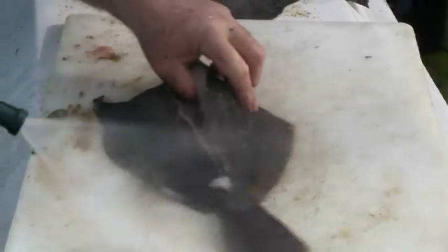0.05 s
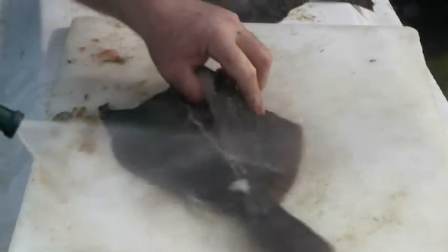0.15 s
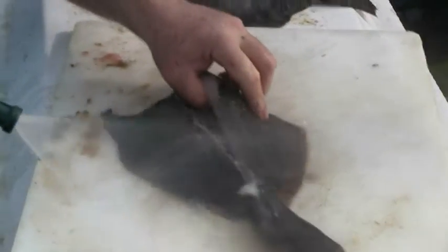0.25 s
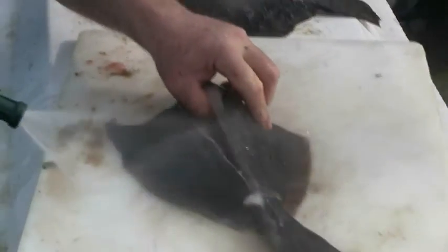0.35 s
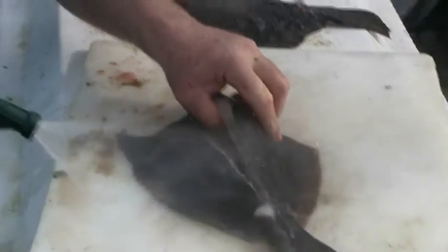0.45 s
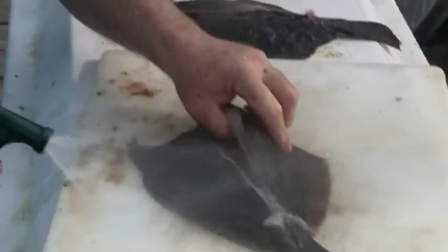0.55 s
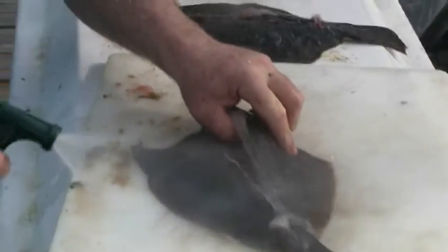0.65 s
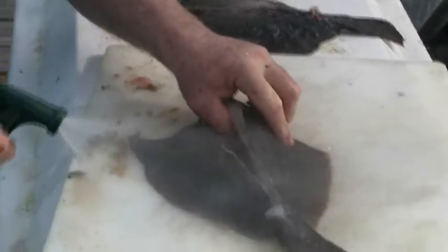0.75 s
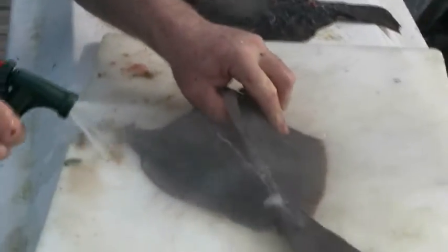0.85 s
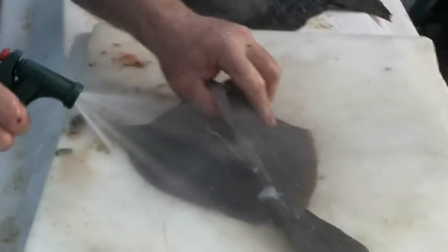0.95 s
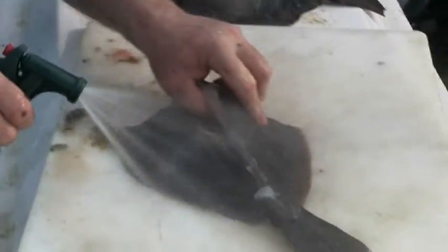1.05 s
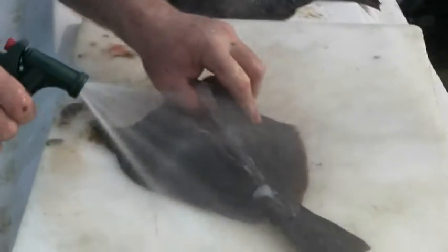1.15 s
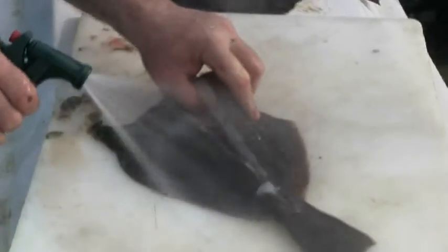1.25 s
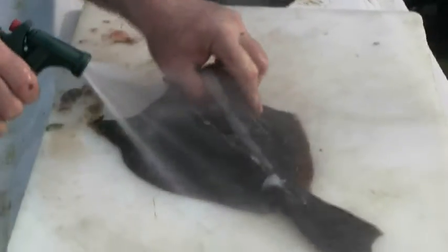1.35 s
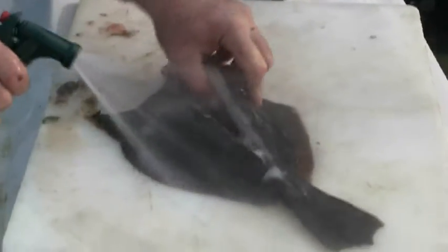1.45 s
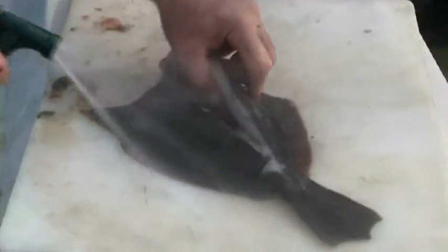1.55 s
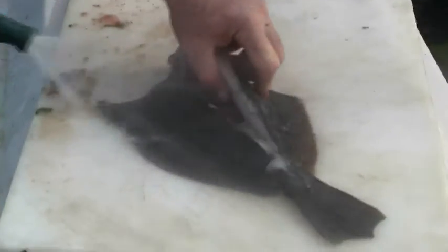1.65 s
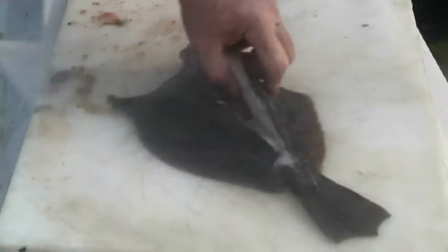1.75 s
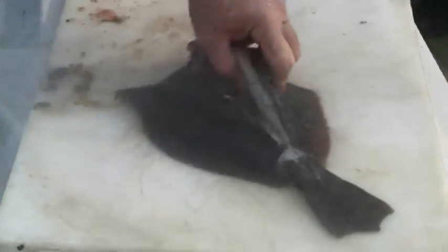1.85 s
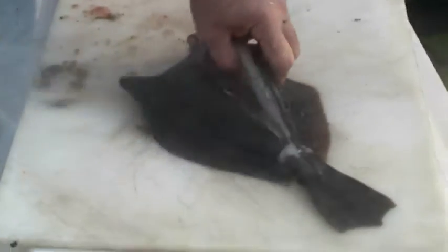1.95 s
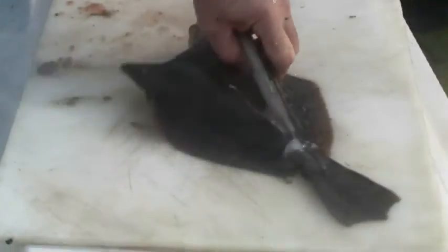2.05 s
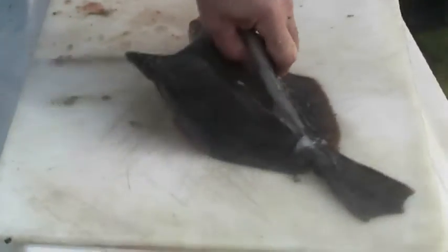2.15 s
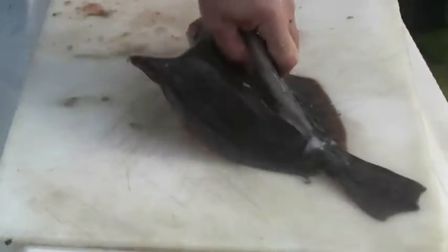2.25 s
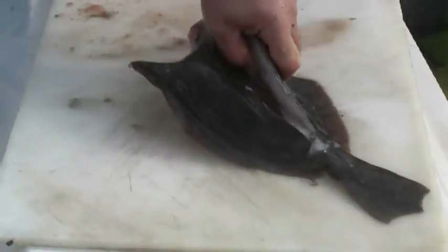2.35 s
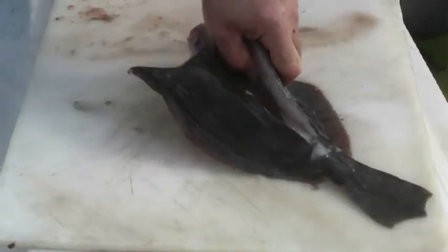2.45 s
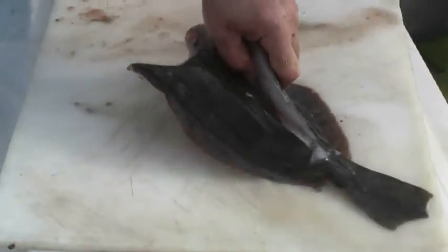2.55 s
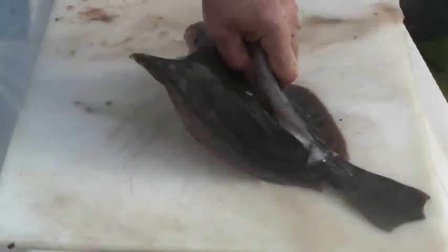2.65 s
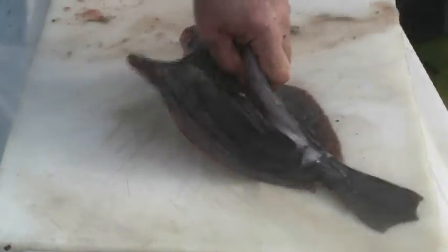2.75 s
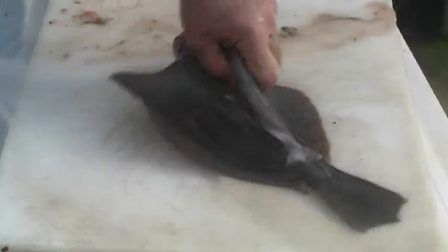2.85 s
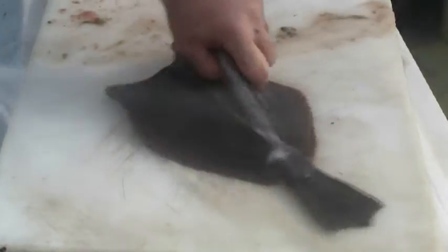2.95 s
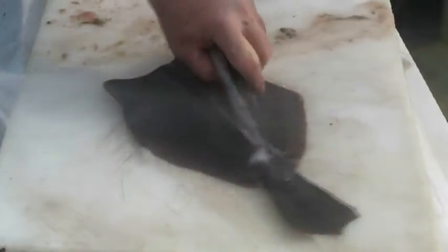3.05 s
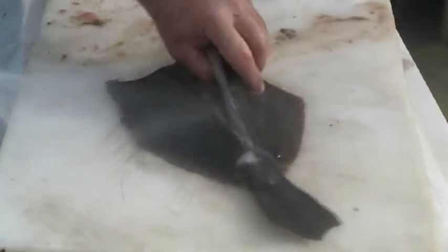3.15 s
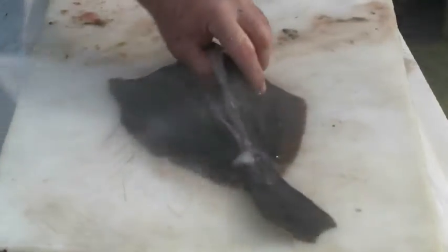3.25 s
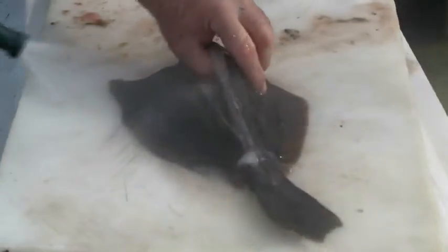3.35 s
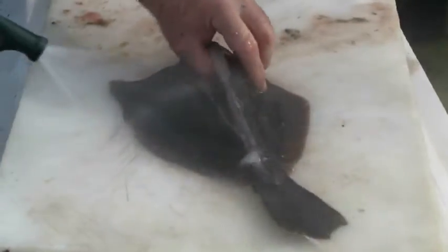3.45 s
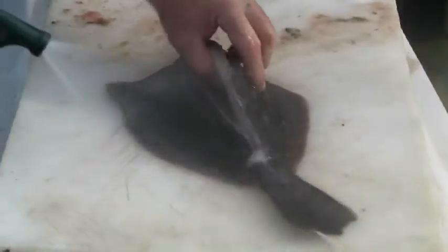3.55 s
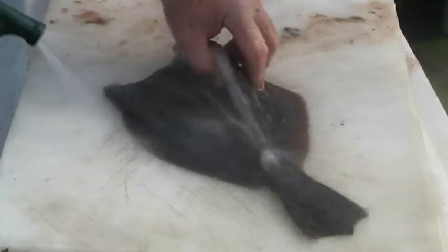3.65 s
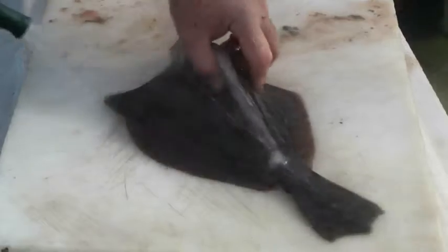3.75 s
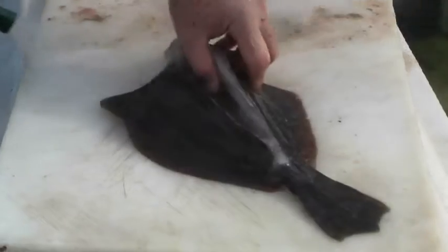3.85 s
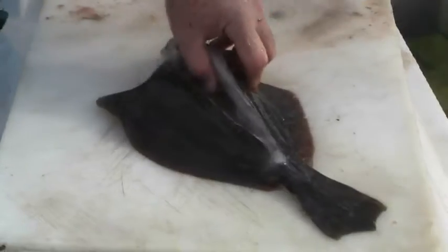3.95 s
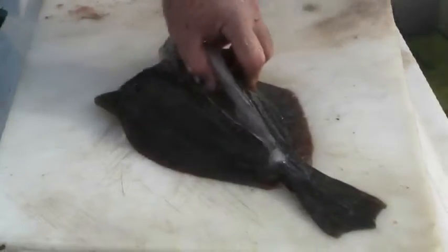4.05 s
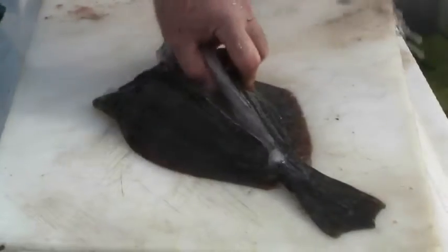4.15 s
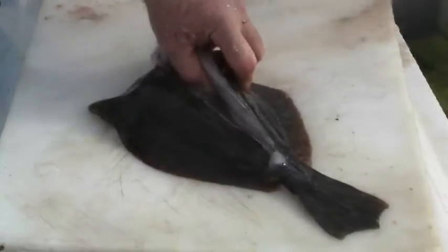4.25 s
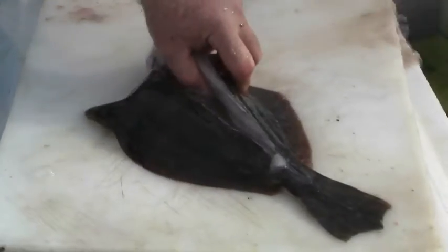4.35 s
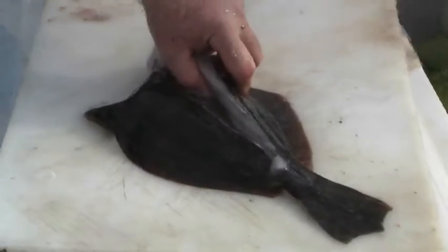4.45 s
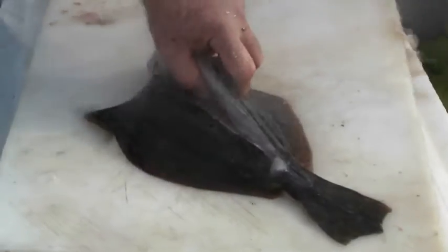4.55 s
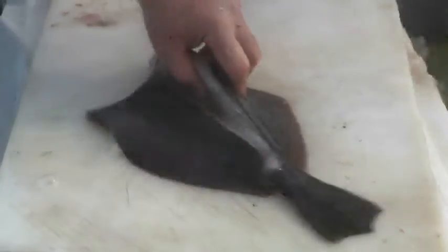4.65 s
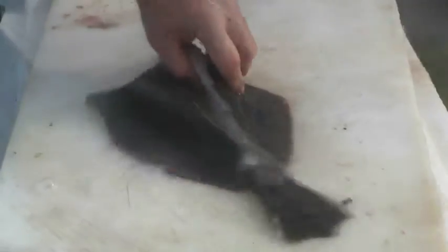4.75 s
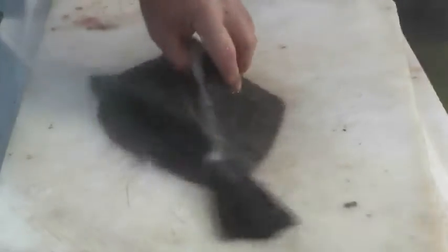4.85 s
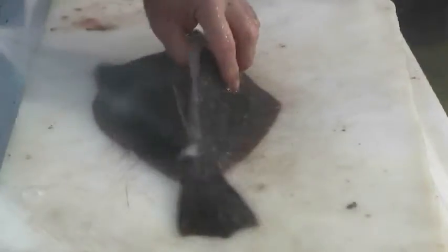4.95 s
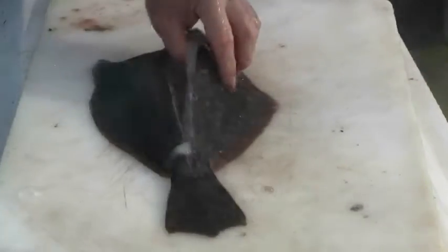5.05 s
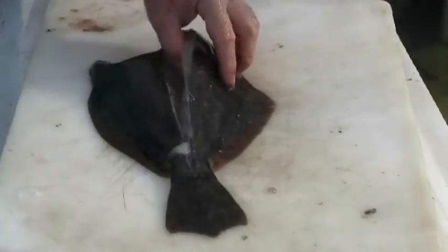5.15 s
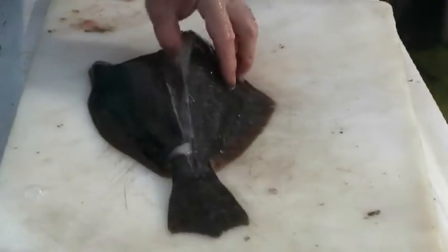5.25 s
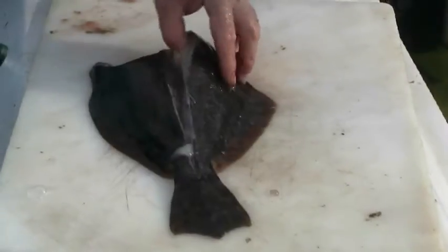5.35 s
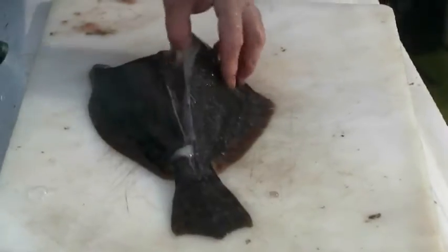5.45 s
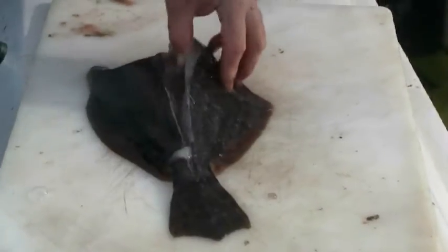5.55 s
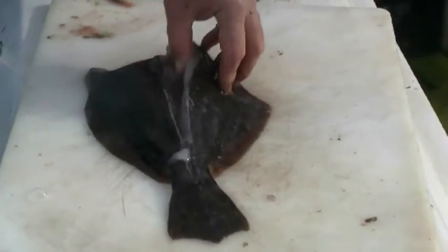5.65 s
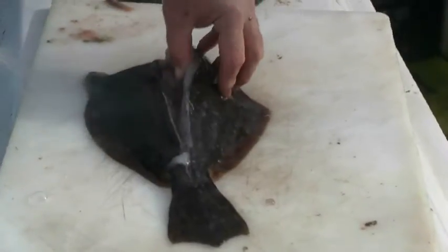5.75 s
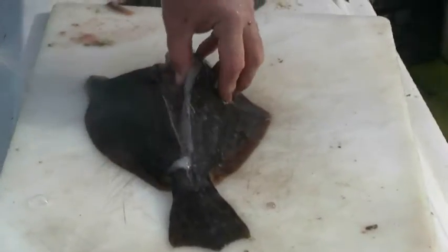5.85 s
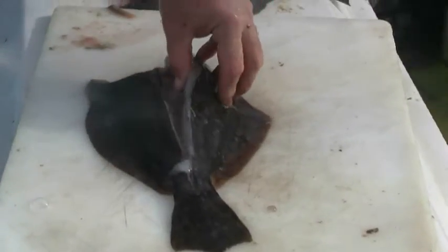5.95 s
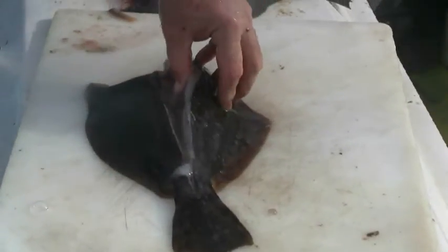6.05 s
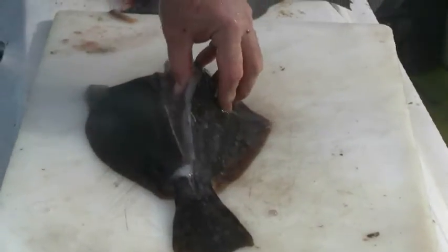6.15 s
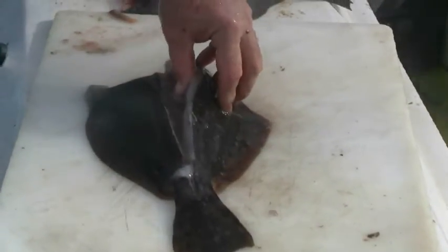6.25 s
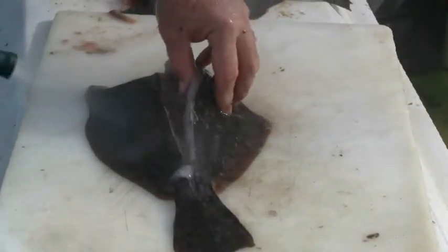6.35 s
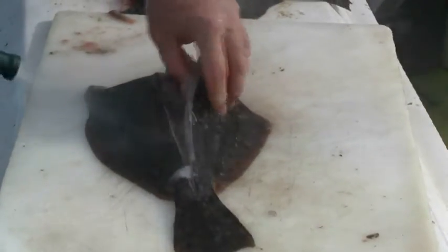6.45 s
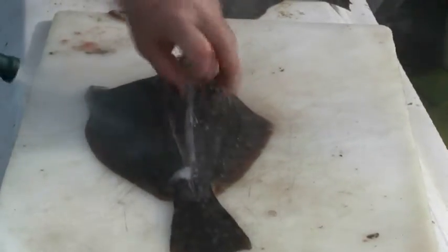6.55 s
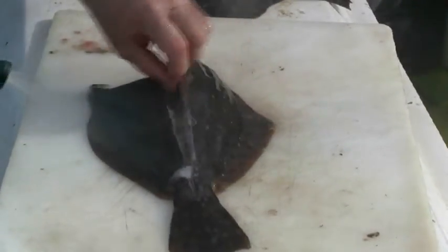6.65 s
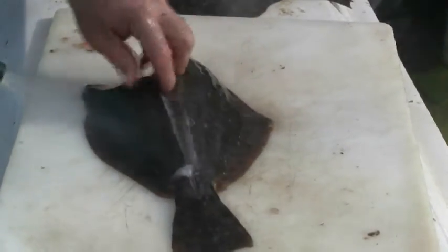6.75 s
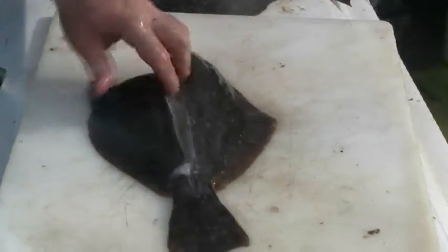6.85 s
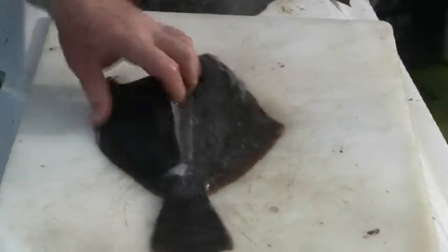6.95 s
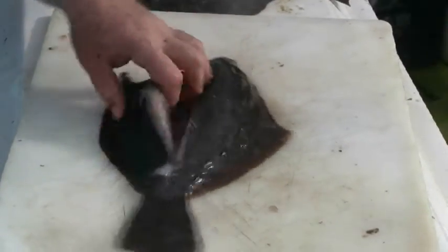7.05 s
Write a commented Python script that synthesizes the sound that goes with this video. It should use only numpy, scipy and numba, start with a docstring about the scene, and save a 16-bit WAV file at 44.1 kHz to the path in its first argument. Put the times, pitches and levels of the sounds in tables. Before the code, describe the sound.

A hose sprays hissing water over a fish on a plastic board, with wet slaps, then softer squirts and a few hard knocks.

```python
"""A hose gun sprays a gutted fish on a plastic cutting board, outdoors, close to the microphone.
The jet tears into droplets that hiss, and its drops patter on skin and board for five seconds.
It shuts, water runs off, and three softer squeezes follow. The wet fish slaps on the board, pockets
of air gloop, and hard knocks make the table ring. Short ringing crackles make wet squelches and
give knocks their bite. Behind it all are the outdoor air and an engine idling far away."""
import sys
import numpy as np
from scipy import signal
from scipy.fft import rfft, irfft
from scipy.io import wavfile
from scipy.ndimage import uniform_filter1d
from numba import njit

SR = 44100
rng = np.random.default_rng(int(sys.argv[2]) if len(sys.argv) > 2 else 0)


def digitize_waveform(pressure):
    """Quantize a signal to 16-bit integers and store it at the path in sys.argv[1].

    Rows of a 2-D input are taken as channels; values are limited to [-1, 1].
    """
    field = np.atleast_2d(pressure).T
    bounded = np.clip(field, -1, 1)
    quanta = np.round(bounded * 32767).astype(np.int16)
    wavfile.write(sys.argv[1], SR, quanta)


N = 312669
T = np.arange(N) / SR
FREQS = np.arange(N // 2 + 1) * SR / N

# squeezes of the trigger: open_s, shut_s, hiss_db, patter_db, attack_s, release_s, mist_share
SQUEEZES = [(0.095, 5.146, -1, 6, 0.022, .1, 1), (5.28, 5.33, -19, -8.5, .008, 0.8, 0),
            (5.5, 5.85, -17, -10, 0.16, 0.4, 1), (5.835, 6.7, -10.5, -5.5, 0.087, 1.36, 1)]
# strength of the jet; treble_db minus level_db sets how bright its top is: time_s, level_db, treble_db
JET_LEVEL = [(0.13, -26.5, -29), (0.18, -29, -33), (1.08, -29.5, -36), (1.52, -27, -28.5), (2.05, -33, -38),
             (2.23, -26.5, -35), (2.65, -26.5, -36), (3.07, -28, -33), (3.36, -28.5, -34),
             (3.79, -24.5, -27), (3.85, -27, -34), (4.14, -27, -39), (4.6, -28, -36), (4.66, -25.5, -34),
             (4.73, -27, -30), (4.84, -25.5, -33), (4.99, -27, -32), (5.13, -26.5, -32.5)]
# the gun sweeps twice over the fish; the echo off the board makes a comb, a row of peaks and dips
# in the hiss: time_s, spacing_hz, depth_factor
AIM = [(.1, 2630, .9), (.85, 2650, .65), (1.3, 2700, 1.0), (1.72, 2800, .7), (1.88, 3200, 0.4),
       (2.05, 4080, .8), (2.22, 4630, 1.3), (2.38, 4950, 0.9), (2.62, 4750, .6), (2.74, 4250, .9),
       (2.88, 3640, .5), (3.2, 3600, .5), (3.48, 3640, .45), (3.7, 4380, 0.4), (3.95, 4800, .7),
       (4.15, 5030, 1.2), (4.28, 4830, 1.4), (4.57, 4450, 0.7), (4.67, 3420, 1.1), (4.76, 2960, 1.3),
       (4.88, 2590, 0.8), (5.15, 2560, 0.6)]
# shape of that comb at depth 1: position_in_spacings, gain_db
COMB_SHAPE = [(.6, 0), (.95, -1.2), (1.2, 2.2), (1.38, 1.2), (1.62, 2.8), (1.85, .8), (2.08, -5.5),
              (2.3, 2.6), (2.42, 3.6), (2.85, -3.8), (3.45, 2.4), (3.8, -2), (4.32, 2.6), (4.7, -2.8),
              (5.5, 2)]
# tone of the jet's hiss: frequency_hz, gain_db
HISS_TONE = [(1500, -27), (2050, -11), (2550, -3.5), (3100, -6), (3700, -15.5), (4300, -8), (4950, -9.5),
             (5550, 0), (6300, 2), (7000, 0.2), (7750, -0.4), (8550, 3.5), (9400, -2), (10100, 0),
             (11000, -2), (11900, -3.5), (12700, -2), (13500, 0), (14300, -3.5), (15700, -4)]
# tone of the fine mist: frequency_hz, gain_db
MIST_TONE = [(6000, -16), (9500, 1), (11500, -1), (13500, 3), (15000, -5)]
# narrow peaks that come and go as the spray fans over hand and fish: centre_hz
HISS_PEAKS = [5200, 6100, 7100, 8500, 9500, 11000]
# faint whistles that glide through the hiss: start_s, length_s, start_hz, end_hz, lift_db
WHISTLES = [(.78, .2, 9600, 10100, 4), (1.66, .17, 7100, 6800, 5), (1.87, .16, 8300, 8750, 3.9),
            (2.1, .2, 10300, 11800, 4), (3.26, .16, 6000, 5850, 3.8), (2.2, .45, 7900, 8300, 2.5),
            (3.85, .7, 7750, 8000, 2.5), (4.15, .4, 6300, 5400, 2.5), (4.6, .3, 8500, 6300, 1.5),
            (4.82, .32, 9150, 8700, 4), (4.8, 0.26, 7100, 6740, 3), (4.8, .4, 5860, 5500, 5.1)]
# tone of drops on skin and board: frequency_hz, gain_db
PATTER_TONE = [(60, -30), (140, -16.5), (250, -5.5), (370, -1.2), (520, -2.8), (900, -2.8), (1200, -0.5),
               (1650, -2), (1950, -5), (2600, -2), (3500, -6), (5000, -3.5), (12000, -11)]
# peaks that come and go in the patter: centre_hz
PATTER_PEAKS = [450, 750, 1200, 1600, 2700]
# the patter turns hollow and fills out again as one band rises and falls: time_s, lift_db
HOLLOWNESS = [(.2, -1), (1.7, -1), (2.1, 2.5), (2.65, 7.5), (3.0, -3), (3.9, 1), (4.1, -1), (4.5, 0),
              (4.8, -3)]
# tone of water dripping off the board: frequency_hz, gain_db
DRIP_TONE = [(300, -25), (700, 3), (1200, 9), (2300, 8.5), (3500, 1), (5000, -1.5), (9000, -5.5),
             (14000, -17)]
# stray drops that land close by: start_s, gain_db
STRAY_DROPS = [(5.182, -26), (5.293, -22), (5.424, -33), (6.221, -12)]
# wet flesh meeting the board (a lower cutoff is a softer blow): start_s, gain_db, cutoff_hz, thump_hz
SLAPS = [(.152, -13, 600, 235), (1.143, -15, 400, 220), (2.191, -10.5, 367, 227), (2.254, -10, 880, 258),
         (2.282, 1, 5000, 290), (2.292, -9, 3500, 370), (2.3038, -11.5, 2500, 370), (2.81, -14, 700, 260),
         (3.201, -12.5, 4000, 260), (3.388, -9, 700, 272), (3.409, -11, 450, 340), (3.44, -8, 950, 420),
         (3.487, -13, 450, 320), (5.494, -12.5, 242, 167), (6.724, -9.5, 340, 160), (6.761, -9.5, 380, 182),
         (6.815, -15, 340, 161), (6.857, -21.5, 3000, 220)]
# tone of slapped flesh: frequency_hz, gain_db
SLAP_TONE = [(60, -37), (130, -18), (230, -1), (330, 2.5), (480, 3), (620, -2), (800, -6.5), (950, -8),
             (1200, -2.5), (1700, -9.5), (2600, -14.5), (3600, -36), (9000, -18.5)]
# short bands of ringing crackle: wet squelches, plus the bite, ring and tail of the hard knocks
# near 5.28 s and 6.75-6.85 s: start_s, length_s, start_hz, end_hz, width_hz, level_db
CRACKLES = [(2.285, 0.047, 2080, 1500, 300, -35), (3.203, 0.018, 1450, 1420, 150, -33),
            (3.359, 0.017, 1250, 885, 200, -29), (3.391, 0.01, 900, 850, 150, -29.5),
            (3.887, 0.033, 2100, 1450, 250, -33.5), (3.925, .025, 1590, 1700, 200, -39),
            (5.132, 0.017, 1200, 1200, 160, -33), (5.18, .09, 2350, 2200, 500, -46),
            (5.2795, 0.0051, 2150, 2100, 350, -25.5), (5.286, 0.042, 2200, 2050, 350, -41),
            (5.379, 0.15, 1070, 1100, 250, -47.5), (5.511, .009, 1750, 1750, 400, -36),
            (5.518, 0.043, 1970, 1960, 350, -43), (5.525, .085, 1600, 1750, 600, -48),
            (5.529, 0.06, 695, 657, 200, -44.5), (5.622, 0.082, 626, 710, 120, -43.5),
            (5.69, 0.05, 2799, 2750, 450, -51), (5.695, 0.075, 496, 460, 100, -46),
            (5.705, 0.06, 1200, 1150, 190, -44), (6.747, 0.013, 1300, 1450, 250, -32),
            (6.747, 0.0045, 3100, 3150, 200, -34), (6.7525, .006, 3150, 3130, 140.1, -24),
            (6.763, 0.014, 2230, 2390, 550, -24.5), (6.783, 0.038, 2150, 1880, 550, -35),
            (6.788, 0.035, 750, 750, 90, -35.5), (6.848, 0.035, 2700, 2400, 800, -46)]
# pockets of air that close under the fish and ring: start_s, length_s, start_hz, end_hz, level_db
AIR_POCKETS = [(1.445, 0.115, 336, 660, -34.5), (1.947, 0.025, 554, 660, -35), (3.068, 0.04, 370, 344, -34),
               (3.865, .03, 2440, 2600, -29), (4.465, 0.021, 737, 830, -35.5),
               (5.237, 0.016, 670, 635, -36.5), (6.836, .072, 319, 845, -38.5),
               (6.996, 0.048, 2640, 2720, -51.5), (7.026, 0.04, 1165, 1380, -48)]
# hard knocks of the gun and on the table: start_s, gain_db, rattle_and_ring_db
KNOCKS = [(3.202, -5, -1), (5.136, -15, -2), (5.185, -19, 0), (5.2807, -4, -9), (5.299, -22, 6),
          (5.34, -19, 0), (5.513, -24, -8), (5.553, -31, -3), (5.693, -24.5, 6), (5.781, -30, -7),
          (5.85, -18, 0), (6.753, -15, 1), (6.76, 5, -4.5), (6.7645, -6, 0), (6.775, -8, 0)]
# tone of a knock's crack: frequency_hz, gain_db
CRACK_TONE = [(100, -4), (220, -13), (500, -4.5), (750, 4), (1100, -9), (1800, 4.5), (2300, 4), (3000, -7),
              (4200, -10), (6000, -18), (8300, -13), (12000, -41)]
# notes the table rings with: pitch_hz, gain_db, decay_s
TABLE_NOTES = [(215, -5, 0.28), (744, -3, 0.3), (1050, -7, 0.27), (1810, 1, 0.13), (2080, -1, 0.1),
               (2230, 2, 0.05), (2520, 9, 0.05), (3110, 5, 0.035)]
# tone of the outdoor air: frequency_hz, gain_db
AIR_TONE = [(25, -19), (45, -10), (60, -19), (110, 3.5), (160, 0.5), (500, -0.5), (1000, -5), (1800, -11),
            (3500, -16), (4300, -14.5), (5200, -17), (8500, -27), (15000, -33)]
# air comes from all sides; how alike it is left and right (1 is identical): frequency_hz, likeness
AIR_LIKENESS = [(70, .99), (120, 1), (200, 0.58), (400, 0.1), (800, 0.3), (1500, 0.8)]
# low notes of the far engine: pitch_hz, gain_db
ENGINE_NOTES = [(58.7, -59.5), (72.2, -60), (81.5, -63), (93, -58)]
# how alike the water sounds at the microphone's two openings: frequency_hz, likeness
WATER_LIKENESS = [(130, 0.98), (500, 0.99), (1200, 1), (2300, 0.98), (4000, 1), (6800, 0.89), (10000, 0.72),
                  (15000, 0.25)]
# how much louder the left opening is than the right: frequency_hz, balance_db
MIC_BALANCE = [(80, 0), (250, 1.3), (600, 0.7), (1100, -1.3), (2200, 2), (3300, -0.5), (6000, 1),
               (7100, -3), (7950, 9.5), (8600, -4), (9300, -2.5), (10300, -0.5), (11600, -1), (12500, -0.5),
               (13600, 10), (15000, 3)]
# how far the wave at the left opening runs ahead: frequency_hz, lead_radians
MIC_LEAD = [(2000, 0.16), (6300, 0.06), (7300, 0.53), (8600, 0.48), (9600, 0.96), (11000, -0.17),
            (12700, 2), (14100, 0)]


def jet(flow, mist_flow):
    """The jet tears into fine droplets that hiss, with a quieter, brighter mist on top."""
    droplets = [rng.standard_normal(N) + amp(-5) * impacts(per_s=4500, spread_db=5) for _ in range(2)]
    noise = stereo(*droplets, WATER_LIKENESS)
    mist = unit(colour(noise, MIST_TONE)) * mist_flow * amp(-12.5 + 1.7 * wander(rate_hz=22))
    hiss = swish(colour(noise, HISS_TONE)) * flow
    return (hiss + mist) * amp(2.08 + 0.65 * wander(rate_hz=40))


def swish(hiss):
    """The comb slides with the aim like a changing vowel; the top swells and dulls; whistles pass."""
    top_hz, top_edge_hz, top_share, whistle_width_hz = 11000, 900, 0.96, 240
    hiss = waver(hiss, HISS_PEAKS, sharpness=28, depth_db=2.8)
    hz, times, slices = signal.stft(hiss, SR, nperseg=512)  # short slices, each split by frequency
    hz = hz[:, None]
    spacing_hz, depth = curves(AIM, times)
    gain_db = depth * np.interp(hz / spacing_hz, *np.transpose(COMB_SHAPE))
    main_band = (hz[:, 0] > 5000) & (hz[:, 0] < 11000)
    gain_db -= gain_db[main_band].mean(axis=0)  # the comb changes the tone more than the loudness
    jet_db, treble_db = curves(JET_LEVEL, times)
    top_db = treble_db - jet_db
    gain_db += top_share * (top_db - top_db.mean()) / (1 + np.exp((top_hz - hz) / top_edge_hz))
    for start_s, length_s, start_hz, end_hz, lift_db in WHISTLES:
        progress = np.clip((times - start_s) / length_s, 0, 1)
        distance = (hz - start_hz - (end_hz - start_hz) * progress) / whistle_width_hz
        gain_db += lift_db * np.sqrt(abs(np.sin(np.pi * progress))) * np.exp(-distance ** 2 / 2)
    _, shaped = signal.istft(slices * amp(gain_db), SR)
    return unit(shaped[:, :N])


def trigger():
    """How strongly hiss, mist and patter sound as the trigger is squeezed and let go."""
    linger_s = 0.096  # drops are still in the air when the trigger shuts
    hiss = mist = drops = 0
    for open_s, shut_s, hiss_db, patter_db, attack_s, release_s, mist_share in SQUEEZES:
        flow = amp(hiss_db) * gate(open_s, shut_s, attack_s, release_s)
        hiss += flow
        mist += mist_share * flow
        drops += amp(patter_db) * gate(open_s, shut_s, attack_s, release_s + linger_s)
    return hiss, mist, drops


def patter(jet_swell_db):
    """Drops drum on skin and board: a dense wash of small ones, with fat ones among them."""
    drops = [impacts(per_s=9000, spread_db=3.5) + amp(-12.5) * impacts(per_s=250, spread_db=5.5)
             for _ in range(2)]
    wash = colour(stereo(*drops, WATER_LIKENESS), PATTER_TONE)
    wash = waver(wash, PATTER_PEAKS, sharpness=8, depth_db=1.5)
    wash = lift_band(wash, hz=2100, width_hz=130, db=curves(HOLLOWNESS)[0])
    lift_off_db = np.interp(T, [3.2, 5.2], [0, -3.5])  # the jet lifts off the board and drums less
    level_db = -32 + 0.28 * jet_swell_db + lift_off_db
    return unit(wash) * amp(level_db + 0.74 * wander(rate_hz=25))


def runoff():
    """When the jet first shuts, the last drops land and water keeps trickling off the board."""
    drops = [impacts(per_s=1400, spread_db=-0.5) for _ in range(2)]
    shut_s = SQUEEZES[0][1]
    gush = amp(-33.5) * gate(shut_s, shut_s, attack_s=0.047, release_s=1.0)
    trickle = amp(-57.5) * (T > shut_s)
    return unit(colour(stereo(*drops, WATER_LIKENESS), DRIP_TONE)) * (gush + trickle)


def stray_drops():
    """Single drops burst with a short, bright tick."""
    track = np.zeros(N)
    for start_s, gain_db in STRAY_DROPS:
        add(track, start_s, amp(gain_db) * rng.standard_normal(SR // 2) * fade(decay_s=0.0065))
    return resonate(track, hz=np.full(N, 7600.), width_hz=3000.)


def slaps():
    """Soft blows: one push, a spatter of small contacts as the flesh settles, and the board's thump."""
    flesh, board = np.zeros(N), np.zeros(N)
    for start_s, gain_db, cutoff_hz, thump_hz in SLAPS:
        blow = 0.19 * impacts(per_s=3000, spread_db=0.5)[:SR // 2] * fade(decay_s=0.14)
        blow[0] -= 2.8  # the push
        soften = signal.butter(2, cutoff_hz, fs=SR, output="sos")
        add(flesh, start_s, amp(gain_db) * signal.sosfilt(soften, blow))
        thump_db = -0.5 - 7 * np.log2(cutoff_hz / 400)  # sharper blows move the board less
        add(board, start_s, 0.11 * amp(gain_db + thump_db) * note(thump_hz, decay_s=0.1))
    return colour(flesh, SLAP_TONE) + board


def crackles():
    """Tiny ticks ring in a narrow band: a wet squelch, or the bite, ring or tail of a hard knock."""
    track = np.zeros(N)
    for start_s, length_s, start_hz, end_hz, width_hz, level_db in CRACKLES:
        hz = np.geomspace(start_hz, end_hz, int(length_s * SR))
        chance, size, fizz = rng.standard_normal((3, SR // 2))[:, :len(hz)]
        ticks = (chance > 2) * size + amp(-22) * fizz
        crackle = resonate(ticks, hz, 3. * width_hz)
        ring = unit(resonate(crackle, hz, float(width_hz))) + amp(-10) * unit(crackle)
        envelope = signal.windows.tukey(len(hz), .3) * amp(np.linspace(0, -9, len(hz)))
        add(track, start_s, amp(level_db) * unit(ring * envelope))
    return track


def gloops():
    """A pocket of air holds its note, then glides as water changes its size; bursting films roughen it."""
    hold_share, glide_share = 0.18, .65  # parts of each gloop's length
    track = np.zeros(N)
    for start_s, length_s, start_hz, end_hz, level_db in AIR_POCKETS:
        count = int(length_s * SR)
        progress = np.linspace(0, 1, count)
        glide = np.sin(np.pi / 2 * np.clip((progress - hold_share) / glide_share, 0, 1)) ** 2
        hz = start_hz * (end_hz / start_hz) ** glide
        splatter = unit(resonate(rng.standard_normal(SR)[:count], hz, 150 + .15 * start_hz))
        tone = sine(hz) + amp(-5) * splatter
        sag_db = -3 * progress + 1.2 * wander(rate_hz=102)[:count]
        envelope = signal.windows.tukey(count, .2) * amp(sag_db)
        add(track, start_s, amp(level_db) * unit(tone * envelope))
    return track


def knocks():
    """Hard blows: a crack, a short rattle and the ring of the table."""
    cracks, rings = np.zeros(N), np.zeros(N)
    for start_s, gain_db, ring_db in KNOCKS:
        rattle = .085 * amp(ring_db) * rng.standard_normal(SR // 2) * fade(decay_s=.075)
        rattle[0] -= 1.6  # the crack
        add(cracks, start_s, amp(gain_db) * rattle)
        for pitch_hz, note_db, decay_s in TABLE_NOTES:
            detuned_hz = pitch_hz * (1 + 0.008 * rng.standard_normal())
            add(rings, start_s, amp(gain_db + ring_db + note_db - 32) * note(detuned_hz, decay_s))
    return colour(cracks, CRACK_TONE) + rings


def echoes(sound):
    """Things around the table scatter the sound back, faintly and briefly."""
    tails = rng.standard_normal((2, SR // 2)) * fade(decay_s=0.25)
    tails /= np.sqrt(np.sum(tails ** 2, axis=1, keepdims=True))
    middle, side = (signal.fftconvolve(sound, tail)[:N] for tail in tails)
    side = signal.sosfilt(signal.butter(1, 250, "high", fs=SR, output="sos"), side)
    return amp(-7) * middle + amp(-13.5) * np.array([side, -side])


def outdoor_air():
    """A soft, low rush from all sides that gently rises and falls."""
    noise = stereo(*rng.standard_normal((2, N)), AIR_LIKENESS)
    return unit(colour(noise, AIR_TONE)) * amp(-46.5 + 1.6 * wander(rate_hz=6))


def engine():
    """A far engine idles on a few wavering low notes and grows a little louder."""
    drone = np.zeros(N)
    for pitch_hz, gain_db in ENGINE_NOTES:
        strength = np.sqrt(2) * amp(gain_db + 1.2 * wander(rate_hz=4.15))
        drone += strength * sine(pitch_hz + 0.8 * wander(rate_hz=3.3))
    return drone * amp(np.interp(T, [4.6, 5.4], [-1.5, 3]))


def amp(db):
    """Turn decibels into a factor to multiply by."""
    return 10 ** (np.asarray(db) / 20)


def unit(x):
    """Scale to an average strength (rms) of 1."""
    return x / np.sqrt(np.mean(x ** 2))


def curves(table, at=T):
    """Read the columns of a time table at the given times."""
    times, *columns = np.transpose(table)
    return [np.interp(at, times, column) for column in columns]


def across(table):
    """Read a frequency table at every frequency."""
    hz, value = np.transpose(table)
    return np.interp(np.log(FREQS + 1), np.log(hz), value)


def colour(x, tone):
    """Filter a sound to the shape of a tone table, keeping the power of plain noise the same."""
    cepstrum = irfft(np.log(unit(amp(across(tone)))), N)
    cepstrum[1:] *= 2 * (np.arange(1, N) < N / 2)  # so the filter rings after a hit, not before
    return irfft(rfft(x) * np.exp(rfft(cepstrum)), N)


@njit
def resonate(x, hz, width_hz):
    """Let through one band of frequencies, whose centre may move."""
    out, band_state, low_state = np.empty(len(x)), 0., 0.
    for i in range(len(x)):
        tuning, damping = np.tan(np.pi * hz[i] / SR), width_hz / hz[i]
        band = (band_state + tuning * (x[i] - low_state)) / (1 + tuning * (tuning + damping))
        band_state = 2 * band - band_state
        low_state += 2 * tuning * band
        out[i] = damping * band
    return out


def lift_band(pair, hz, width_hz, db):
    """Raise or lower one band in both channels; its centre and gain may move."""
    centre_hz = np.minimum(hz * np.ones(N), SR * 4 / 9)
    band = np.array([resonate(channel, centre_hz, float(width_hz)) for channel in pair])
    return pair + (amp(db) - 1) * band


def waver(pair, centres_hz, sharpness, depth_db):
    """Narrow peaks swell, drift and vanish at random."""
    for hz in centres_hz:
        drifting_hz = hz * (1 + .035 * wander(rate_hz=5))
        pair = lift_band(pair, drifting_hz, hz / sharpness, depth_db * wander(rate_hz=8))
    return pair


def wander(rate_hz):
    """A smooth random curve with a typical size of 1."""
    step = int(SR / rate_hz)
    stairs = np.repeat(rng.standard_normal(N // step + 1), step)
    return unit(uniform_filter1d(stairs, step)[:N])


def impacts(per_s, spread_db):
    """Tiny hits of uneven size at random moments."""
    hits = rng.random(N) < per_s / SR
    signs = np.sign(rng.standard_normal(N))
    sizes = amp(spread_db * np.minimum(rng.standard_normal(N), 2))
    return unit(hits * signs * sizes)


def fade(decay_s):
    """A half-second curve that falls 60 dB every decay_s."""
    return np.exp(-np.log(1000) * T[:SR // 2] / decay_s)


def note(hz, decay_s):
    """A struck note that dies away."""
    return fade(decay_s) * np.sin(2 * np.pi * hz * T[:SR // 2])


def sine(hz):
    """A pure tone that follows a moving pitch."""
    return np.sin(2 * np.pi * np.cumsum(hz) / SR)


def gate(open_s, shut_s, attack_s, release_s):
    """Rise after opening; once shut, fall 60 dB every release_s."""
    rise = 1 - np.exp(-np.maximum(T - open_s, 0) / attack_s)
    return rise * np.exp(-np.log(1000) * np.maximum(T - shut_s, 0) / release_s)


def add(track, start_s, sound):
    """Mix a sound into the track at start_s."""
    i = int(start_s * SR)
    track[i:i + len(sound)] += sound[:N - i]


def stereo(middle, side, likeness):
    """Mix two noises into left and right, as alike at each frequency as the table says."""
    alike = np.clip(across(likeness), 0, 1)
    middle = rfft(middle) * np.sqrt((1 + alike) / 2)
    side = rfft(side) * np.sqrt((1 - alike) / 2)
    return irfft(np.array([middle + side, middle - side]), N)


def scene():
    """Mix the spray, the handling of the fish, the knocks and the background."""
    jet_db, _ = curves(JET_LEVEL)
    flow, mist_flow, drop_flow = trigger()
    spray = amp(jet_db) * jet(flow, mist_flow) + drop_flow * patter(jet_db - jet_db.mean())
    water = spray + runoff()
    centred = slaps() + crackles() + gloops()
    hard = knocks()
    # the knocks lie to the right: they reach the left opening later and weaker
    hard_pair = np.array([amp(-2.5) * np.roll(hard, 1), hard])
    handling = centred + hard_pair + echoes(centred + hard)
    return water + handling + outdoor_air() + engine() + stray_drops()


def record(dry):
    """Each microphone opening colours and delays the sound in its own way; rumble and the top are cut."""
    lowest_hz, highest_hz = 48, 15600
    left = amp(across(MIC_BALANCE) / 2) * np.exp(1j * across(MIC_LEAD) / 2)
    openings = np.array([left, 1 / left])
    openings /= np.sqrt(np.mean(abs(openings) ** 2, axis=0))
    heard = irfft(rfft(dry) * openings, N)
    heard = signal.sosfilt(signal.butter(5, lowest_hz, "high", fs=SR, output="sos"), heard)
    return signal.sosfilt(signal.ellip(10, .2, 80, highest_hz, fs=SR, output="sos"), heard)


dry = scene()
out = record(dry)
digitize_waveform(out)
```